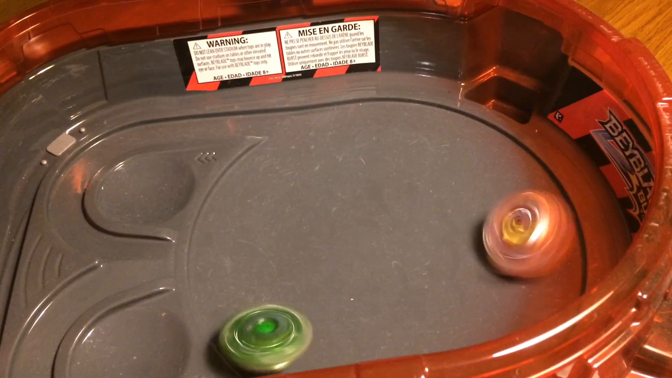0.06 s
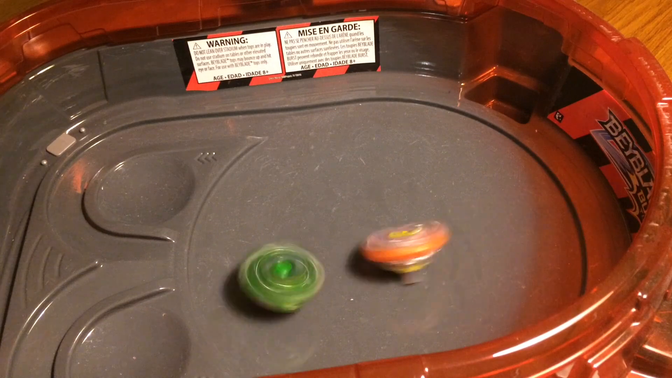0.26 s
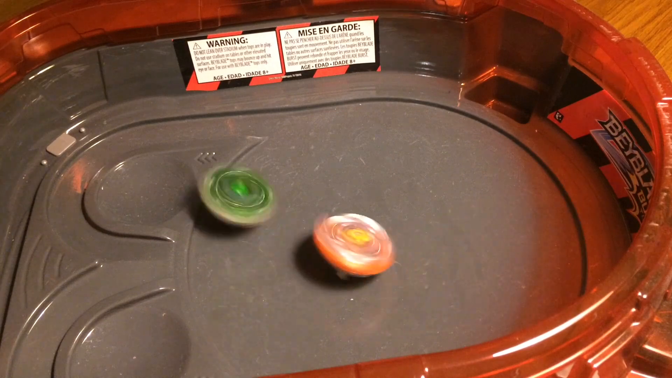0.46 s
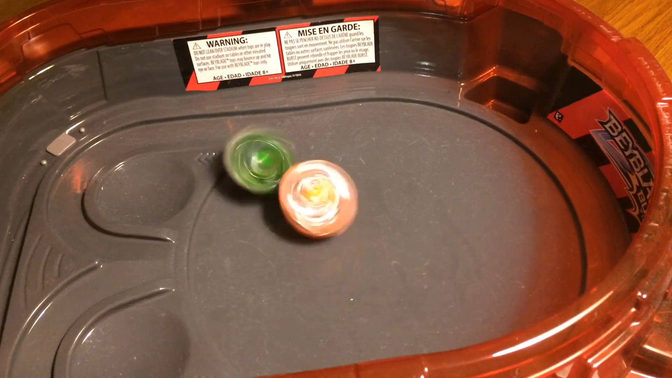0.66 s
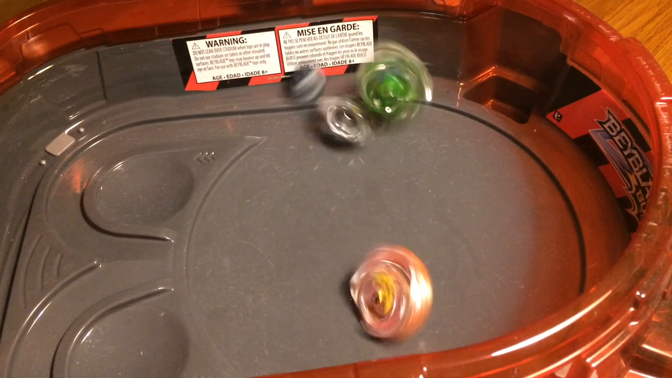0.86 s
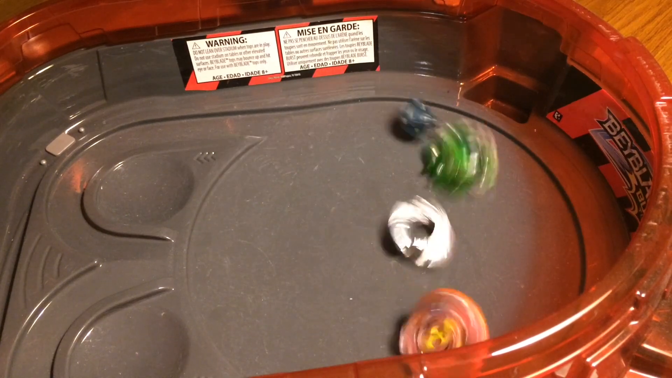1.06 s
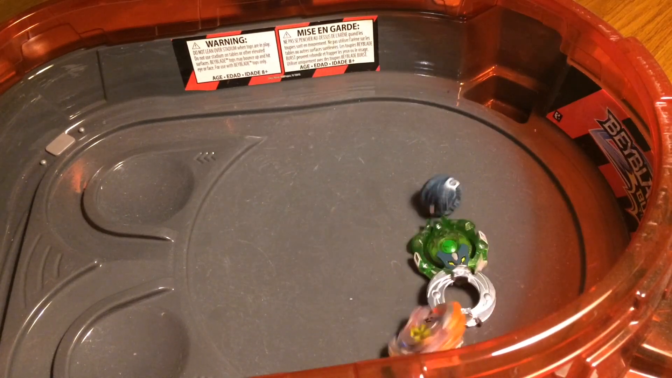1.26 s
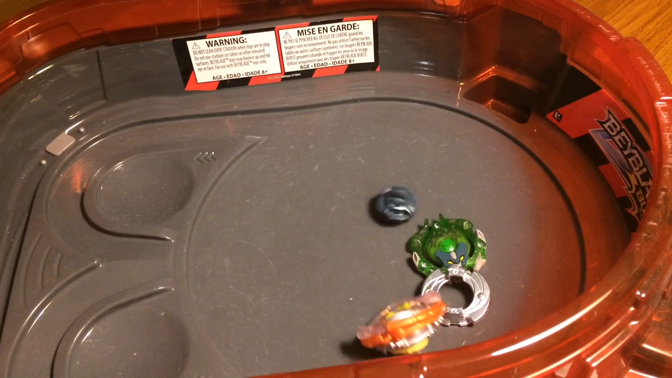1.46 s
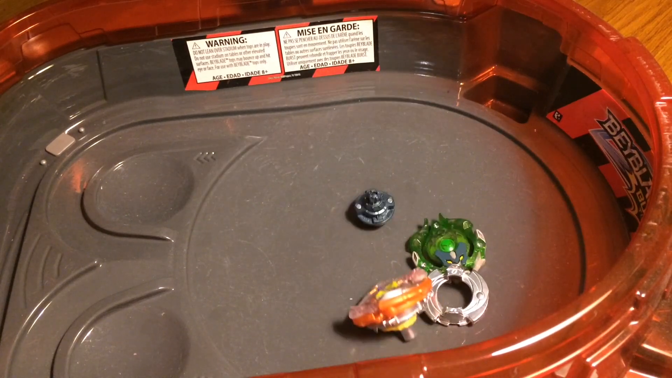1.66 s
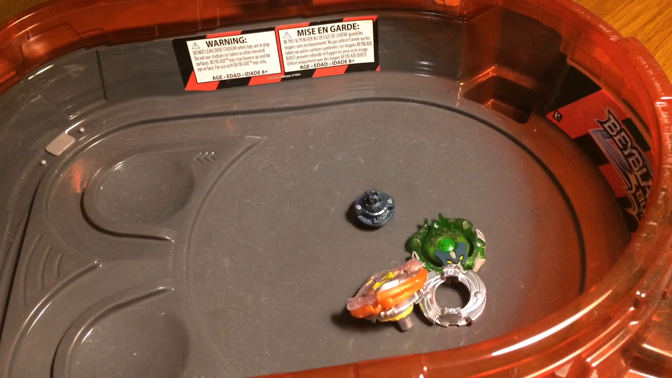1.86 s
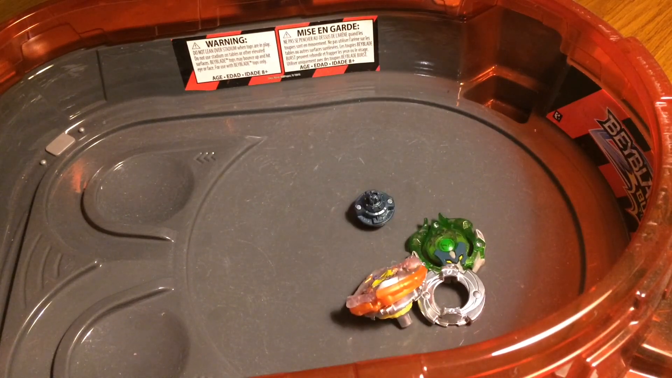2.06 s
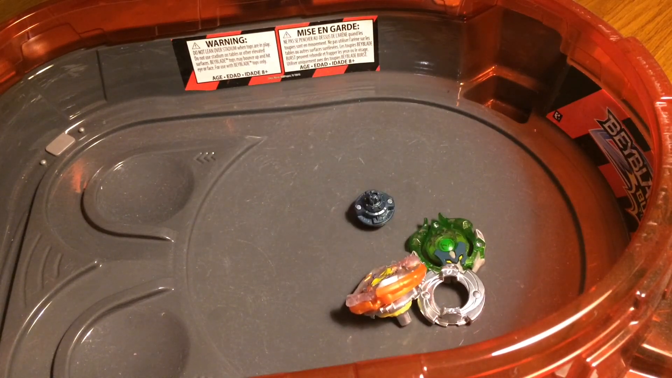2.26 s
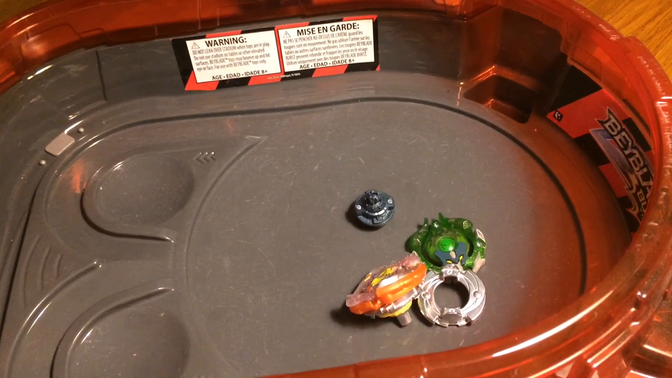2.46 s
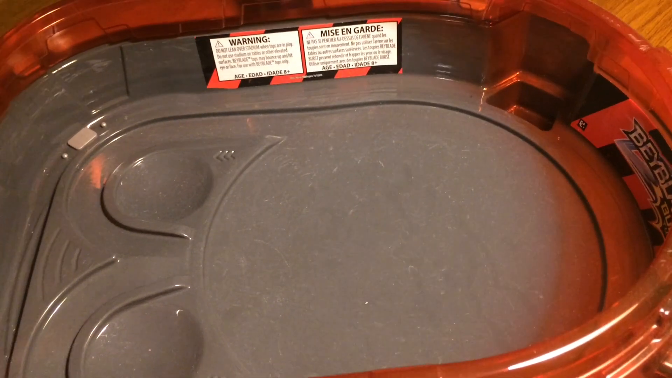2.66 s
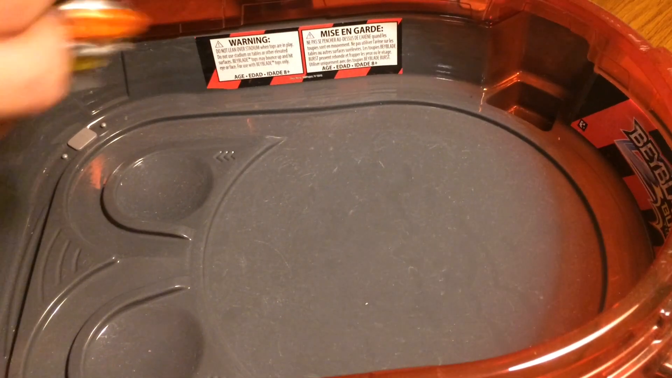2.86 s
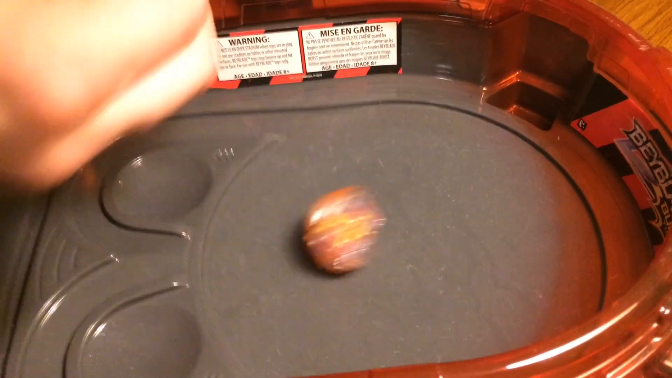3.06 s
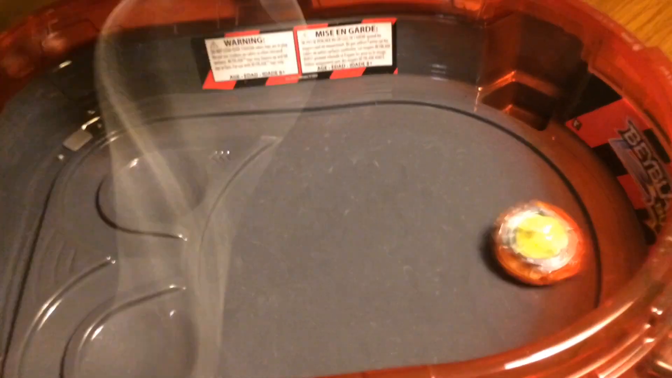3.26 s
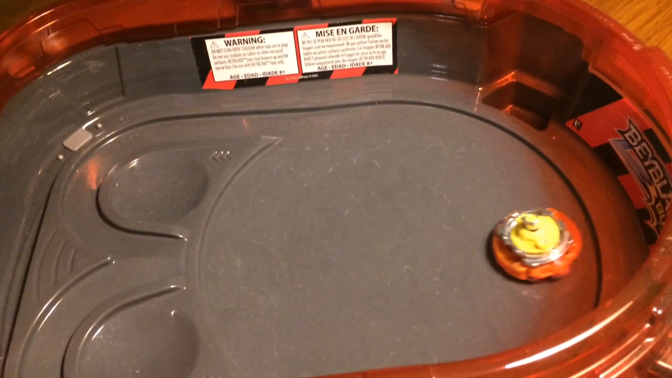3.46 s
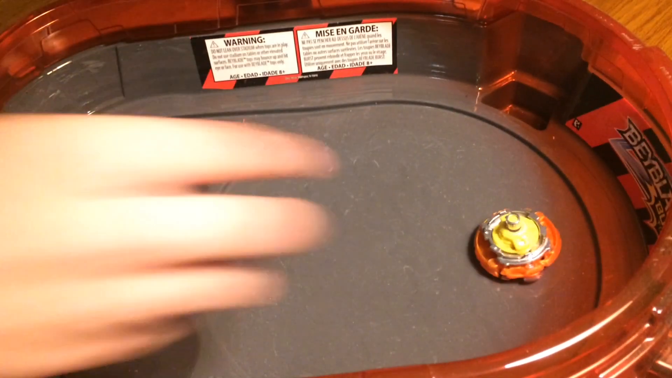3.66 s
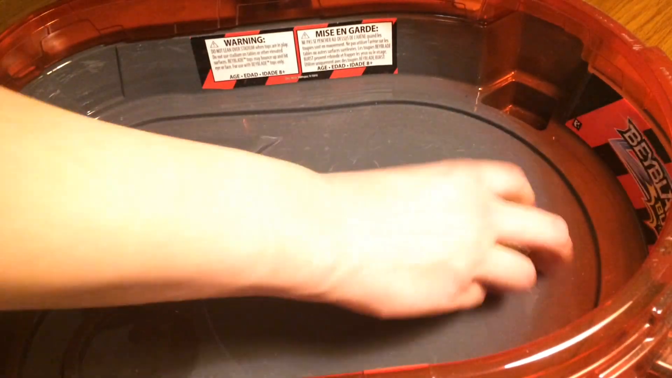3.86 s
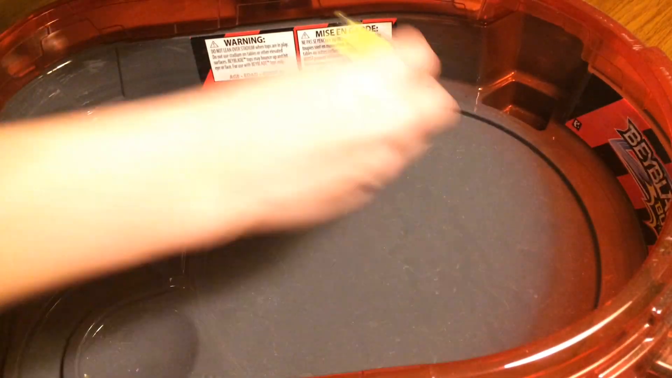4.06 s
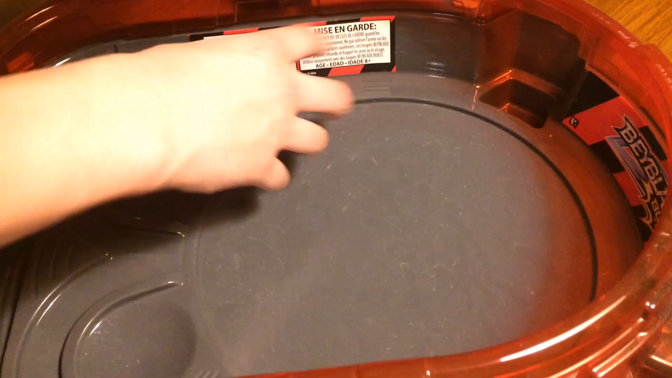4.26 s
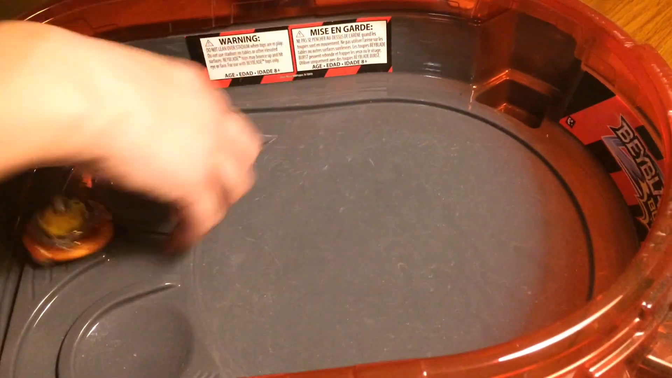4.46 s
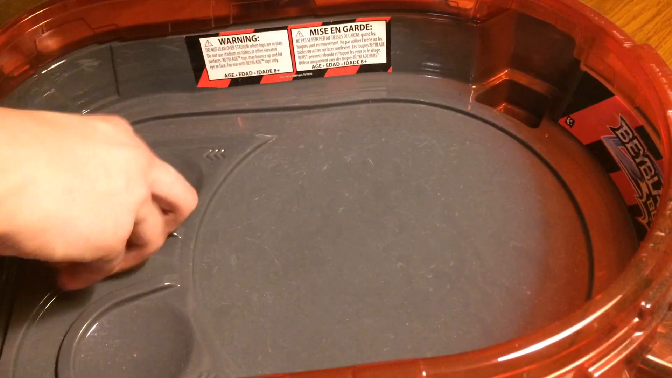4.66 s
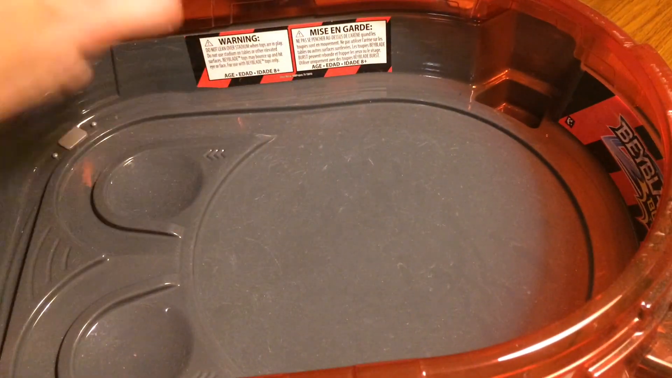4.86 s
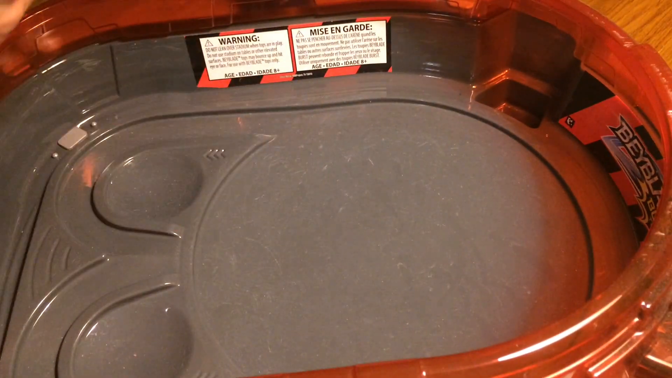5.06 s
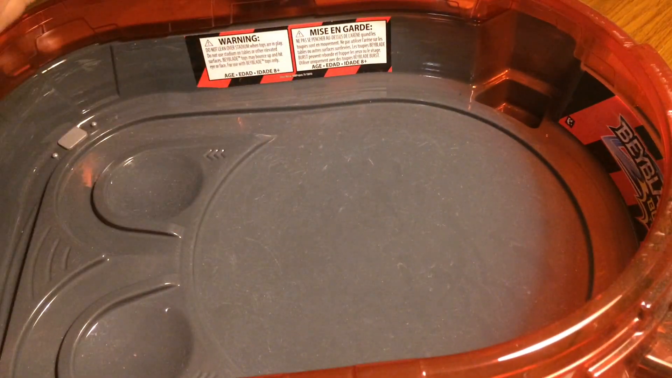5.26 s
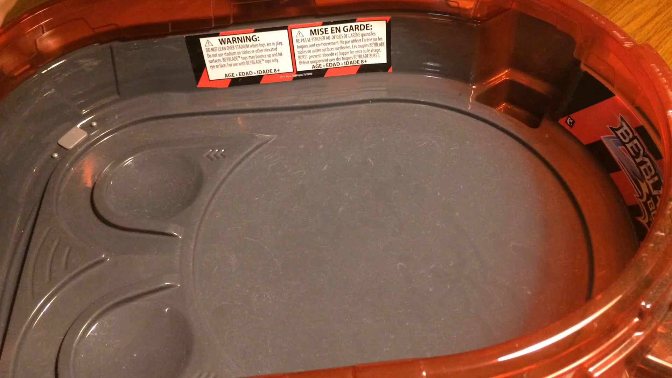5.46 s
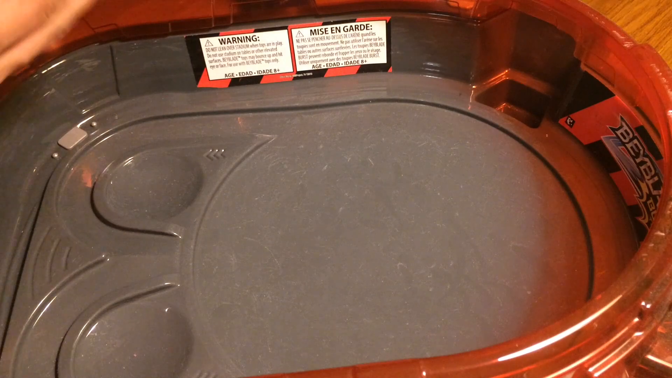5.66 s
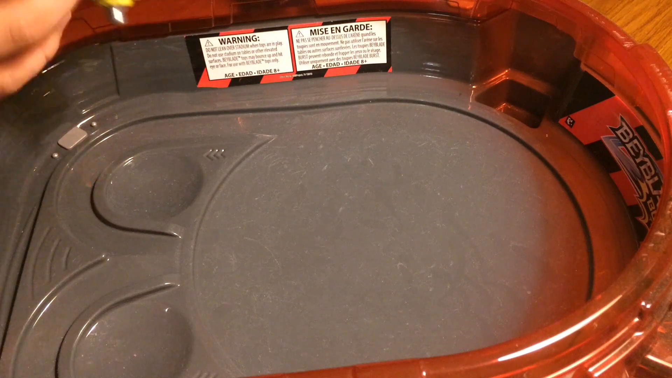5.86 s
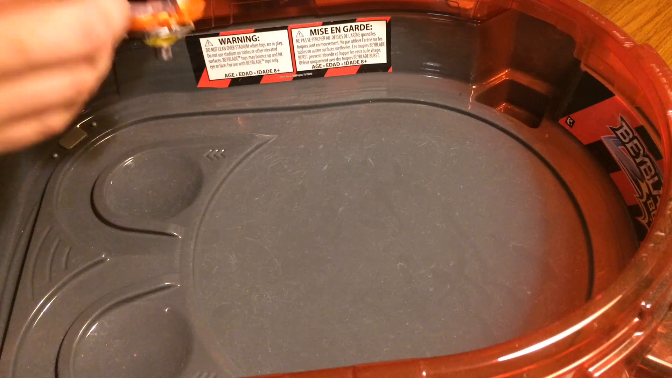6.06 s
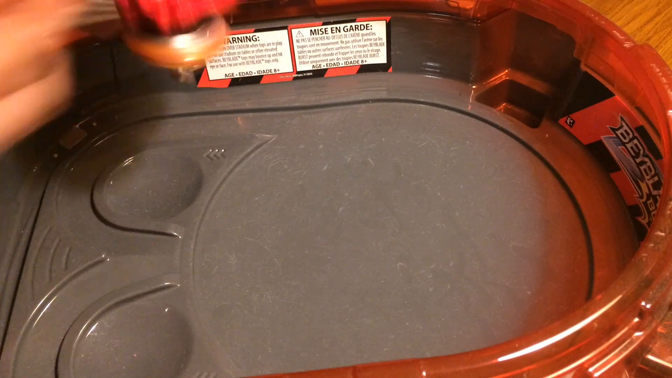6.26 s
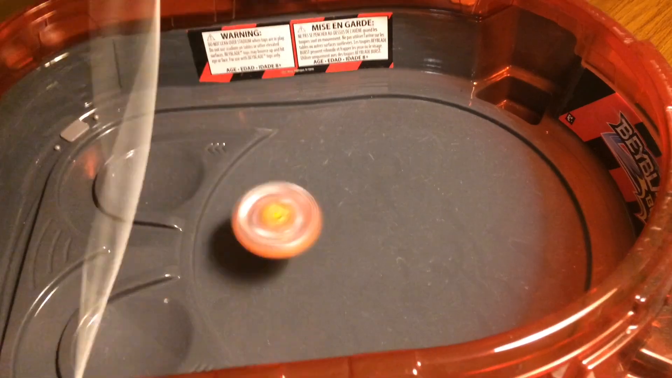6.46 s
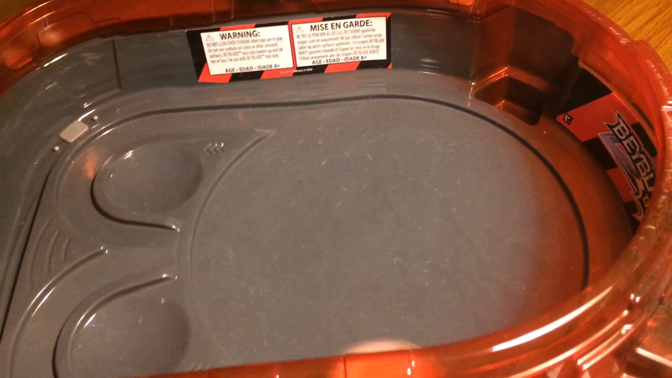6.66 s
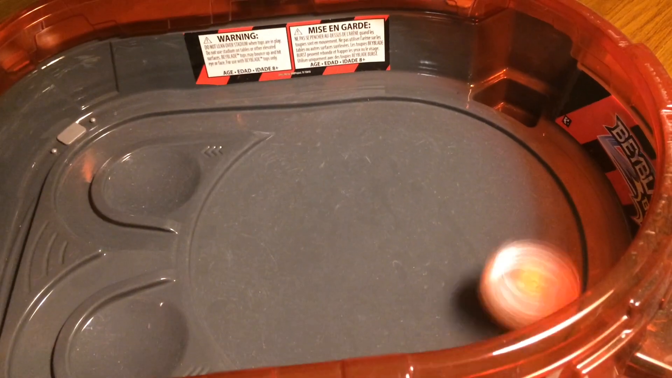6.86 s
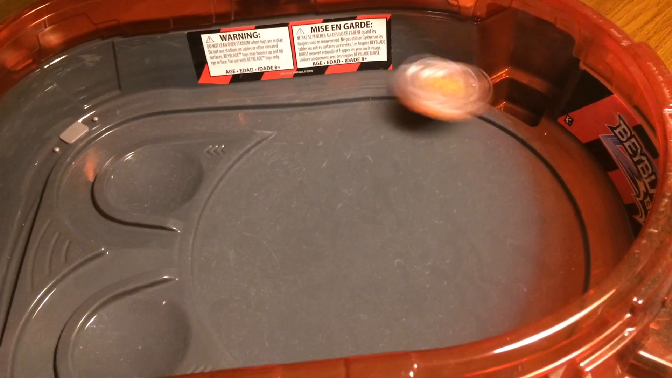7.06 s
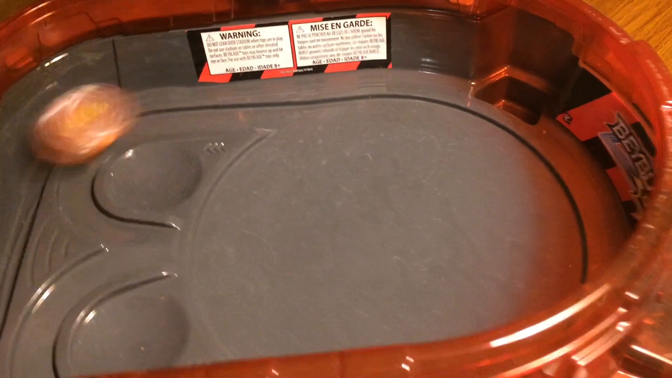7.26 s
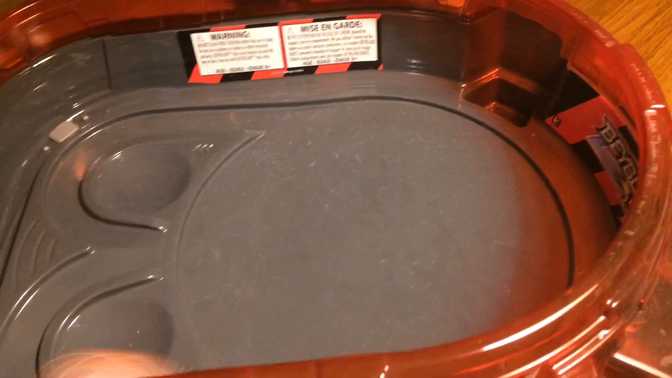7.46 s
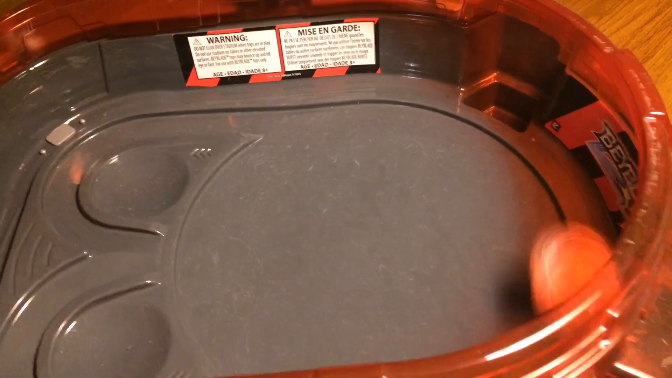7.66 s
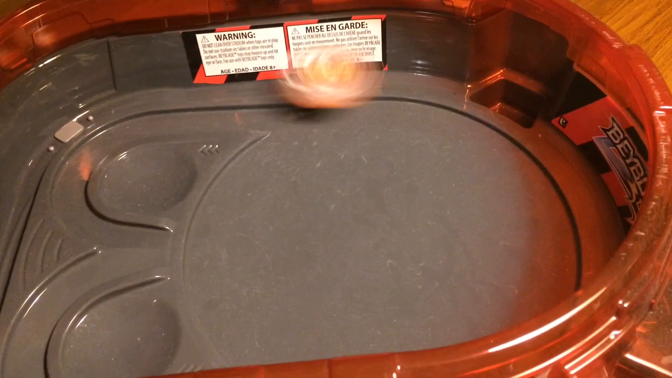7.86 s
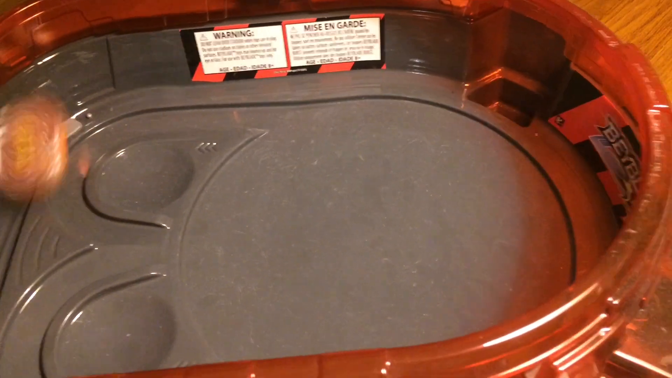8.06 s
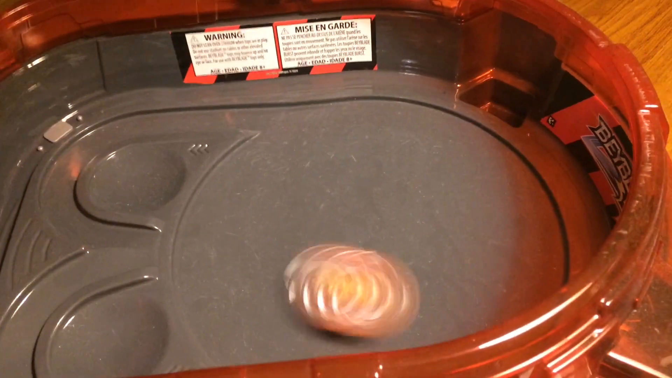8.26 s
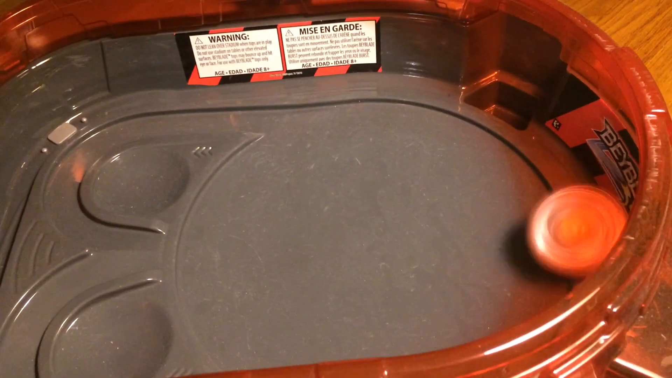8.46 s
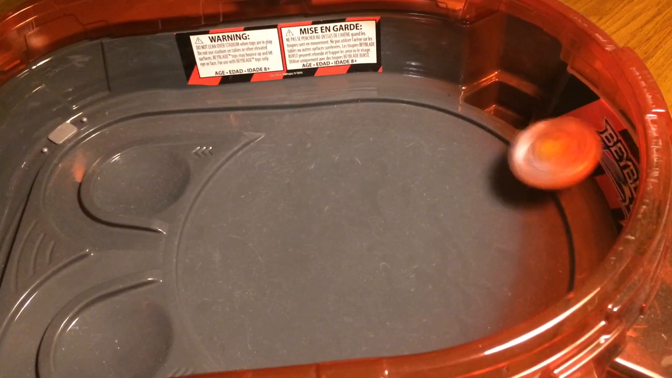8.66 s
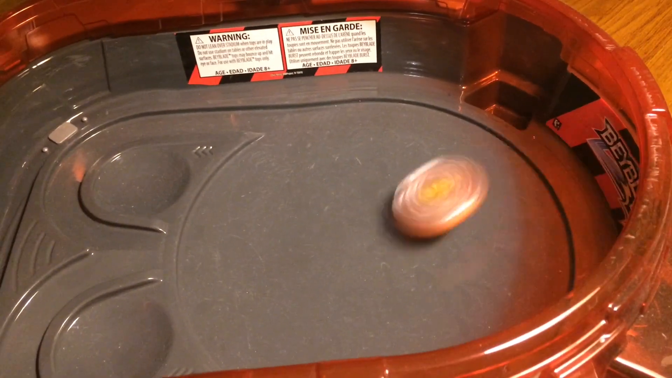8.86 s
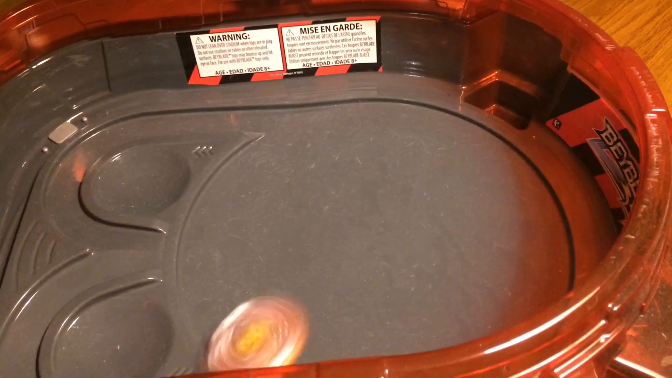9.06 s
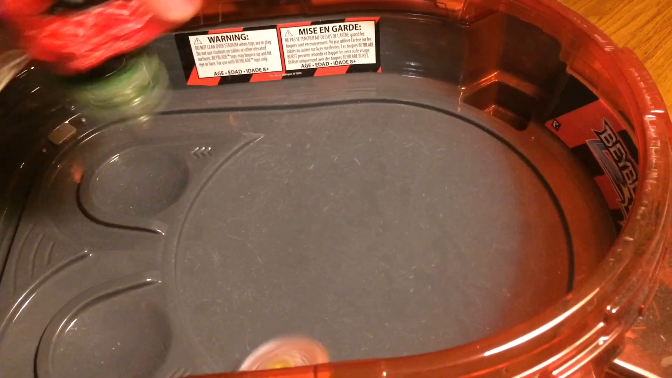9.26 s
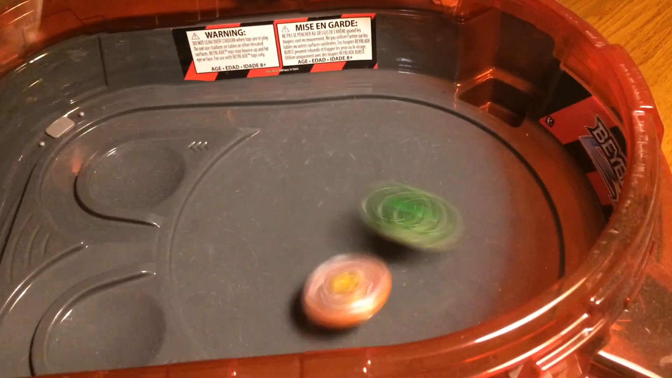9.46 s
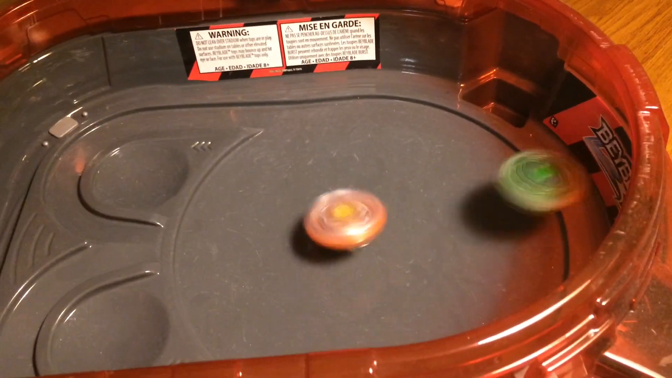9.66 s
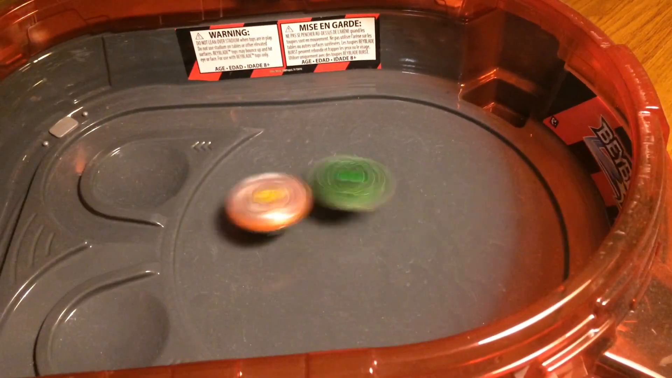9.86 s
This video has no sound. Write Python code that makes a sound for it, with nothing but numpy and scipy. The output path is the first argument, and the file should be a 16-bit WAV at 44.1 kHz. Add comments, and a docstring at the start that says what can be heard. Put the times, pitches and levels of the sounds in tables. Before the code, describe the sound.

Very close in a small quiet room, plastic tops roll and crack together in a thin hollow arena. One bursts and its metal ring jingles. After a near-silent pause, a string launcher zips and a top clatters down; a hand clicks its parts. A second pull sends it drumming loudly along the rim, then a third adds another top and more knocks. The loudest hits distort.

```python
"""Plastic tops roll, knock and clash in a thin arena in a small quiet room: each blow is a burst of impacts on
ringing shell modes. One top bursts and its metal ring, a sum of dying sines, jingles; a hand then gathers and
clicks the parts (noise ticks, fine grit). A geared string launcher whirs up three times, as rattle with a rising
mesh tone; after each pull tops roll and knock again, with clicks of a metal disc after the first two. After the
second they drum along the rim. The loudest blows overload the input of the close microphone."""
import sys
import numpy as np
from scipy import signal
from scipy.fft import rfft, irfft, next_fast_len
from scipy.io import wavfile
from scipy.ndimage import uniform_filter1d

SR = 44100
rng = np.random.default_rng(int(sys.argv[2]) if len(sys.argv) > 2 else 0)


def master_out(mix):
    """Clip the mix to full scale and print it as 16-bit PCM to the path in sys.argv[1]."""
    frames = np.transpose(np.atleast_2d(mix))
    ceiling = np.clip(frames, -1, 1)
    pcm = np.round(ceiling * 32767).astype(np.int16)
    wavfile.write(sys.argv[1], SR, pcm)


N = 437031


def gain_of(db):
    """Level law: decibels to an amplitude factor."""
    return 10 ** (np.asarray(db) / 20)


def evened(x):
    """Energy normalisation: scales to rms 1."""
    return x / np.sqrt(np.mean(x ** 2) + 1e-20)


def peaked(x):
    """Peak normalisation: scales to peak 1."""
    return x / (abs(x).max() + 1e-20)


def read(points, hz):
    """Interpolation of a (Hz, value) table on a log-frequency axis."""
    f, value = np.transpose(points)
    return np.interp(np.log(hz + 1), np.log(f + 1), value)


def add(mix, s, sound):
    """Superposition: mixes a sound in at s seconds."""
    part = mix[max(round(s * SR), 0):][:len(sound)]
    part += sound[:len(part)]


def coloured(x, spectrum):
    """Linear filtering by a (Hz, dB) table."""
    size = next_fast_len(len(x))
    gain = gain_of(read(spectrum, np.fft.rfftfreq(size, 1 / SR)))
    return irfft(rfft(x, size) * gain, size)[:len(x)]


def hump(x, hz, octaves, db):
    """Broad resonance: lifts a smooth range of the spectrum around hz."""
    away = np.log2((np.fft.rfftfreq(len(x), 1 / SR) + 1) / hz) / octaves
    return irfft(rfft(x) * gain_of(db * np.exp(-away ** 2)), len(x))


def ringing(modes, seconds):
    """Modal decay: one exponentially dying sine a mode, as rows."""
    hz, db, t60 = np.transpose(modes)[:, :, None]
    t = np.arange(round(seconds * SR)) / SR
    return gain_of(db - 60 * t / t60) * np.sin(2 * np.pi * hz * t)


def slow(size, width):
    """Low-passed noise: a smooth random wander of rms 1."""
    once = uniform_filter1d(rng.standard_normal(size), int(width))
    return evened(uniform_filter1d(once, int(width)))


def chatter(size, per_s, spread_db):
    """Random impact train: tiny impacts of either sign, a few much larger than the rest."""
    height = gain_of(spread_db * np.minimum(rng.exponential(1, size), 4)) * rng.choice([-1., 1.], size)
    return height * (rng.random(size) < per_s / SR)


# spectrum of the quiet room air: frequency_hz, relative level_db per Hz
AIR_SPECTRUM = [(20, -42), (45, -15), (90, -13), (110, -6), (195, -10.5), (242, -21), (293, -14.5),
                (400, -22.5), (775, -29), (16000, -49)]
AIR_DB = -59.5  # rms


def quiet_air():
    """Stationary noise: a steady random pressure with a fixed spectrum."""
    return gain_of(AIR_DB) * evened(coloured(rng.standard_normal(N), AIR_SPECTRUM))


# each band's reverberation time: frequency_hz, t60_s
ROOM_DECAY = [(100, 0.17), (500, 0.36), (2000, 0.33), (6000, 0.33), (14000, 0.24)]


def room(x):
    """Frequency-dependent reverberation: three sparse random tails, faded in turn for a smooth, even echo."""
    out, slots = np.zeros(N), np.arange(200, SR // 2 - 20, 20)
    for k in range(3):
        taps = np.zeros(SR // 2)
        taps[slots + rng.integers(0, 20, len(slots))] = rng.choice([-1., 1.], len(slots))
        hz, t, bands = signal.stft(taps, SR, nperseg=256)
        decay = gain_of(-60 * t / read(ROOM_DECAY, hz)[:, None])
        tail = signal.istft(bands * decay, SR, nperseg=256)[1]
        # fixed 20 Hz swings, 60 degrees apart: their squares add up to 1
        turn = np.sqrt(2 / 3) * np.cos(np.pi * (np.arange(N) * 40 / SR + k / 3))
        out += signal.fftconvolve(x * turn, tail / np.linalg.norm(tail))[:N]
    return out


# deep jolts through the table as the launcher is worked: start_s, length_s, level_db
TABLE_JOLTS = [(3.16, 0.38, -34), (6.43, 0.18, -34), (9.08, 0.14, -34), (9.361, 0.045, -23.5)]


def jolts():
    """Band-limited noise: short swells of deep rumble."""
    out, band = np.zeros(N), signal.butter(2, [44, 75], "band", fs=SR, output="sos")
    for s, length, db in TABLE_JOLTS:
        size = round(length * SR)
        rumble = evened(signal.sosfilt(band, rng.standard_normal(size)))
        add(out, s, gain_of(db) * rumble * signal.windows.tukey(size, .4))
    return out


# fingers brushing over plastic parts: start_s, length_s, level_db
FINGER_RUSTLES = [(1.95, 0.074, -63.5), (2.862, 0.2, -70), (5.345, 0.15, -48), (5.729, 0.087, -53),
                  (6.119, 0.22, -61.5)]


def rustles():
    """Friction as many micro-impacts: soft swells of fine grit."""
    out = np.zeros(N)
    for s, length, db in FINGER_RUSTLES:
        grit = hump(chatter(round(length * SR), 2500, spread_db=6.0), 2700, octaves=2.8, db=34)
        add(out, s, gain_of(db) * evened(grit) * signal.windows.tukey(len(grit), .7))
    return out


# small clicks: loose or handled parts, the launcher, light knocks and hops of the rolling tops:
# start_s, peak level_db before the bass cut, loudest pitch_hz
SMALL_CLICKS = [(0.0588, -20, 1270), (0.1377, -20.5, 1310), (0.222, -20, 1280), (0.3383, -18, 1220),
                (0.422, -12, 1240), (0.5378, -18.5, 1060), (0.673, -15, 1630), (0.8488, -13, 1080),
                (1.031, -12, 1200), (1.1627, -15.5, 1710), (1.1988, -22, 1220), (1.2565, -20, 1190),
                (1.308, -23, 1040), (1.3693, -17, 1850), (1.5717, -20, 980), (1.608, -21, 1300),
                (1.6358, -26, 1020), (1.6653, -37, 1210), (1.6927, -24, 3220), (1.715, -27, 1200),
                (1.8862, -27.5, 1800), (1.9504, -45, 6600), (2.0023, -43.5, 1096), (2.5247, -50, 1050),
                (2.8737, -48, 2020), (2.9732, -35.5, 2870), (3.5448, -17, 5530), (3.591, -3.5, 5230),
                (3.996, -23, 1215), (4.303, -15, 1710), (5.0271, -11, 2700), (5.1463, -30.5, 2730),
                (5.1943, -38, 2580), (5.3083, -36.5, 3100), (5.3536, -12.5, 3130), (5.36, -17, 3000),
                (5.3737, -7.5, 3380), (5.459, -28, 3360), (5.4999, -16.5, 2670), (5.5497, -37.5, 1330),
                (5.7457, -33.5, 2510), (5.767, -31.5, 2600), (6.313, -15, 1780), (6.4296, 1.5, 3540),
                (6.672, -13.5, 3160), (6.788, -13, 1050), (6.8603, -2, 1170), (8.0463, -3, 3450),
                (8.0707, -9, 1130), (8.318, -12, 1297), (8.656, -13.5, 1240), (8.704, -5, 1780),
                (8.75, -17, 1450), (9.64, -12, 1784)]
SOFT_DB, SOFT_RISE_S = -53.5, 0.0024  # a tick this quiet is fully soft and rises this slowly
ECHO_T60_S, ECHO_DB = 0.39, -19.5


def ticks():
    """Impact bandwidth: small clicks, each with a second bounce and an echo; softer ones are rounder and duller."""
    out, t = np.zeros(N), np.arange(15000) / SR
    echo = gain_of(ECHO_DB - 60 * t / ECHO_T60_S) * np.minimum(t / .008, 1)
    for s, db, hz in SMALL_CLICKS:
        soft = np.clip(db / SOFT_DB, .02, 1)
        rise = np.minimum(t / (SOFT_RISE_S * soft ** 2), 1)
        since_bounce = t - rng.uniform(0.012, 0.019)
        shape = rise * np.exp(-t / 0.0039) + 0.13 * np.exp(-abs(since_bounce) / 0.00084)
        centre_hz = 3600 * (hz / 3600) ** soft  # hard ticks centre near 3600 Hz, soft ones on their tone
        colour = hump(rng.standard_normal(len(t)), centre_hz, octaves=3.47, db=37.5)
        toned = hump(colour, hz, octaves=0.2, db=6.0 + 7.8 * soft)
        add(out, s, gain_of(db) * peaked(toned * (shape + echo)))
    thin = signal.butter(2, 700, "high", fs=SR, output="sos")  # small clicks have little bass
    return signal.sosfilt(thin, out)


# modes of the loose metal ring: frequency_hz, level_db, t60_s
RING_MODES = [(9448, -5, .3), (9706, 0, .36), (12660, -14, .18), (14080, -5, .26), (15500, -6, .17)]
# its strikes: start_s, level_db
RING_STRIKES = [(.433, -34.5), (0.762, -27), (1.032, -38.5), (1.273, -24.5), (3.172, -26.5)]


def loose_ring():
    """Modal superposition: each strike sets the ring's modes off in a slightly different mix."""
    out, rows = np.zeros(N), ringing(RING_MODES, .4)
    for s, db in RING_STRIKES:
        add(out, s, gain_of(db + 1.5 * rng.standard_normal(len(RING_MODES))) @ rows)
    return out


# modes of the metal weight disc held in its top: frequency_hz, level_db, t60_s
DISC_MODES = [(5880, 0, .25), (7300, 0, .14), (8080, 0, .07), (9480, 0, .14)]
# its strikes: start_s, level_db, favoured mode pitch_hz
DISC_STRIKES = [(3.18, -22, 7300), (3.18, -26, 9480), (3.343, -15, 8080), (4.308, -30, 5880),
                (4.418, -35, 5880), (6.495, -12.5, 8080), (6.868, -13.5, 8080)]


def held_disc():
    """Selective damping: the plastic around the disc silences all but the mode that the strike favours."""
    out, rows = np.zeros(N), ringing(DISC_MODES, 0.27)
    mode_hz = np.transpose(DISC_MODES)[0]
    for s, db, hz in DISC_STRIKES:
        add(out, s, gain_of(db) * rows[np.argmin(abs(mode_hz - hz))])
    return out


# colour of the launcher shell: frequency_hz, relative level_db per Hz
LAUNCHER_SHELL = [(180, -47), (300, -24.5), (1690, -7), (2070, -12), (2840, -3), (4090, -7.5), (16000, -16)]
# string pulls: start_s, length_s, first whir level_db, loudest level_db, first gear mesh pitch_hz, last pitch_hz
STRING_PULLS = [(3.166, 0.23, -34.5, -22, 2420, 10900), (6.289, 0.17, -54, -11, 1207, 10170),
                (9.242, 0.13, -38.5, -11.5, 1490, 9930)]
LOUDEST_SHARE, REST_DB, RUNDOWN_S = 0.72, -41.5, 0.25  # the whir peaks late in the pull, then runs down


def launcher():
    """Gear meshing: teeth rattle in the shell; their faint mesh tone climbs as the string speeds up."""
    out = np.zeros(N)
    for s, length, start_db, top_db, first_hz, last_hz in STRING_PULLS:
        t = np.arange(0, LOUDEST_SHARE * length + RUNDOWN_S, 1 / SR)
        late = t - LOUDEST_SHARE * length
        swell = (start_db - top_db) * (late / late[0]) ** 2
        rundown = (REST_DB - top_db) * late / RUNDOWN_S
        db = top_db + np.where(late < 0, swell, rundown)
        rattle = evened(coloured(chatter(len(t), 3500, spread_db=2.5), LAUNCHER_SHELL))
        throb = gain_of(2.5 * evened(uniform_filter1d(rng.standard_normal(len(t)), 350)))
        hz = first_hz + (last_hz - first_hz) * np.sin(np.pi / 2 * t / length) ** 2
        wander = 1 + .3 * uniform_filter1d(rng.standard_normal(len(t)), 60)
        mesh = np.sin(2 * np.pi * np.cumsum(hz * wander) / SR)
        pulled = (t < length) * t / length  # the mesh tone grows, and sounds only while pulled
        add(out, s, gain_of(db) * (rattle * throb + 0.72 * mesh * pulled))
    return out


# arena floor as a drum, also struck by the blows: frequency_hz, level_db, t60_s
FLOOR_DRUM = [(110, -6, .09), (167, 0, .1), (205, -6, .06), (265, -9, .05), (365, -3, .06), (480, -6, .05),
              (560, -6, .05)]
# colour of the tip scraping on the floor: frequency_hz, relative level_db per Hz
TIP_SCRAPE = [(180, -32.5), (300, -1), (1280, -4), (5800, -20), (12900, -30), (16000, -46)]
# patches of floor that the tip crosses: pitch_hz
PATCH_TONES = 500, 1250, 1800, 2800
# spells of rolling: start_s, steady until_s, stop_s, drumming level_db, scrape level_db, change by the stop_db
ROLLING_SPELLS = [(0, 0.413, 0.55, -34, -30, -3.5), (0.47, 0.698, 1.02, -26.5, -35.5, -8),
                  (0.76, 1.342, 1.57, -30, -28, -23), (1.567, 1.67, 1.95, -38.5, -37.5, -30),
                  (3.164, 3.415, 3.56, -31, -23, -29), (3.928, 3.987, 4.12, -43, -39, -32),
                  (4.191, 4.252, 4.67, -28, -30.5, -14), (6.422, 7.0, 7.6, -33, -31, -4.5),
                  (7.6, 8.78, 8.97, -32, -37.5, -7), (8.917, 8.984, 9.25, -35, -33.5, 8),
                  (9.252, 9.616, 9.91, -29.5, -28, -4)]


def rolling():
    """Roughness excitation: dense bumps drive floor and scrape; the wobbling top presses unevenly and skips."""
    out, drum = np.zeros(N), ringing(FLOOR_DRUM, .2).sum(0)
    for start, slows, stop, drum_db, scrape_db, change_db in ROLLING_SPELLS:
        t = np.arange(start, stop, 1 / SR)
        size = len(t)
        press = gain_of(3.1 * slow(size, 460))
        skips = signal.lfilter([1], [1, -.996], abs(chatter(size, 45, spread_db=1.0)))
        bumps = chatter(size, 2200, spread_db=2.5) * (press + skips)
        drive = bumps + 1.6 * chatter(size, 3000, spread_db=1.0)
        drummed = signal.fftconvolve(drive, drum)[:size]
        rumble = gain_of(drum_db) * evened(hump(drummed, 145, octaves=0.69, db=10))
        scratch = coloured(bumps, TIP_SCRAPE)
        patches = sum(hump(scratch, hz, octaves=0.28, db=9.5) * gain_of(6.2 * slow(size, 900))
                      for hz in PATCH_TONES)
        scrape = gain_of(scrape_db) * evened(patches)
        course = gain_of(np.interp(t, [slows, stop], [0, change_db]))
        add(out, start, course * (rumble + scrape) * signal.windows.tukey(size, 400 / size))
    return out


# arena walls and plastic top bodies, too many modes to tell apart: frequency_hz, level_db per Hz
SHELL_SPECTRUM = [(200, -22.5), (350, 2.5), (600, -0.5), (900, -0.5), (1300, 0), (2600, -3), (5000, -16),
                  (7000, -36.5)]
# colour of hard rims meeting: frequency_hz, relative level_db per Hz
CRACK_SPECTRUM = [(3000, -15.5), (5000, 1), (9000, 0), (16000, -8)]
# The three kinds of blow share the columns: start_s, peak level_db, struck spot pitch_hz, contact_s
# rims knocking on the arena wall
RIM_KNOCKS = [(.37, -12, 440, 0.015), (.389, -12.5, 1030, 0.0053), (.656, -13, 1680, 0.012),
              (.796, -9.5, 587, 0.014), (.815, -2.5, 569, 0.0034), (.94, -3.5, 1190, 0.0047),
              (.977, -3, 625, 0.012), (1.122, -10, 540, 0.0087), (3.366, -0.5, 1094, 0.0043),
              (4.28, -1.5, 564, 0.002), (4.291, -3, 907, 0.017), (4.389, -3.5, 820, 0.0055),
              (6.461, 2, 1231, 0.021), (6.826, 2, 1152, 0.013), (7.413, 3.5, 368, 0.022),
              (7.51, 2, 804, 0.012), (7.614, 2.5, 1444, 0.016), (7.682, 1, 1285, 0.011),
              (7.714, 3, 682, 0.0077), (7.75, -1, 546, 0.0053), (7.789, -3, 1530, 0.0066),
              (7.813, -3.5, 1385, 0.0059), (7.892, 2.5, 1160, 0.0078), (8.033, 0.5, 1324, 0.031),
              (8.14, 4.5, 780, 0.01), (8.445, -2, 538, 0.011), (8.554, -1, 1325, 0.0018),
              (8.601, 0, 1430, 0.0049), (8.617, -1.5, 833, 0.0039), (8.69, 1.5, 1007, 0.011),
              (9.292, -1.5, 3170, 0.014), (9.373, 1.5, 2560, 0.012), (9.423, 1, 471, 0.0091),
              (9.662, -1.5, 1530, 0.038)]
# tops and parts landing on the arena floor
FLOOR_LANDINGS = [(.878, -4.5, 1270, 0.0052), (1.061, -4.5, 1147, 0.0046), (3.168, -3.5, 815, 0.0036),
                  (3.187, -7.5, 500, 0.0065), (3.206, -9, 700, 0.005), (3.225, -5, 520, 0.0029),
                  (3.243, -14, 600, .007), (3.331, -1, 580, 0.01), (3.939, -15.5, 367, 0.027),
                  (4.189, -2.5, 398, 0.006), (4.237, -8.5, 390, 0.0063), (4.32, -7.5, 1230, 0.0082),
                  (4.37, -6, 363, 0.013), (4.434, -10.5, 1190, 0.0048), (4.49, -13, 873, 0.017),
                  (4.635, -19.5, 597, 0.013), (4.706, -13.5, 448, 0.012), (6.521, -2.5, 292, 0.0068),
                  (6.921, -16, 400, 0.0057), (7.148, -12, 1250, 0.0013), (7.218, -14.5, 437, 0.0034),
                  (7.272, -19, 623, 0.0038), (7.319, -17, 500, 0.0027), (8.091, -3, 1470, 0.0092),
                  (8.325, -10, 520, 0.012), (8.365, -12, 364, 0.01), (8.847, -13.5, 348, 0.0034),
                  (8.921, -15, 460, 0.0025), (8.965, -16.5, 408, .004), (9.566, -10, 478, 0.011),
                  (9.788, -10, 1550, 0.0046), (9.875, -13, 1700, 0.0046)]
# hard edge against hard edge
EDGE_CLASHES = [(.433, -7.5, 5810, 0.0047), (.748, -10.5, 2920, 0.013), (.759, -4, 3250, 0.0054),
                (.77, -4.5, 2580, 0.0052), (.779, -7, 1470, 0.0045), (.969, -7.5, 2440, 0.0024),
                (.992, -5.5, 900, .0012), (1.269, -15.5, 550, 0.0099), (3.306, -3.5, 550, 0.0051),
                (3.957, -15.5, 1250, 0.0039), (6.696, -3.5, 2800, 0.0054), (7.097, -5.5, 1110, 0.0024),
                (7.165, -7.5, 1250, 0.0076), (7.341, -8, 423, 0.008), (8.212, -7, 1970, 0.0024),
                (9.195, -5.5, 1195, 0.0046)]
# what each kind adds: arena thump_db re peak, hard crack_db re peak
KNOCK_MIX = (-29.5, -7.5)
LANDING_MIX = (-0.71, -6.5)
CLASH_MIX = (-13, 3.8)
SHELL_T60_S = 0.018  # common to all shell modes
SPOT_T60_S, SPOT_DB = .045, -7.5  # the struck spot rings on by itself, re the body's peak
THUMP_T60_S = 0.087  # a top resting on the floor damps its thump, on top of the drum's own decay
CRACK_RISE_S = 0.00094


def blows():
    """Repeated impact: a spinning rim chatters through each contact and excites shell modes near the spot's tone."""
    out, drum, t = np.zeros(N), ringing(FLOOR_DRUM, .2), np.arange(2646) / SR
    kinds = (RIM_KNOCKS, KNOCK_MIX), (FLOOR_LANDINGS, LANDING_MIX), (EDGE_CLASHES, CLASH_MIX)
    rows = [tuple(row) + tuple(mix) for table, mix in kinds for row in table]
    for s, db, hz, contact, thump_db, crack_db in rows:
        release = np.exp(-(t / np.clip(contact, .001, .04) / 1.49) ** 1.9)
        force = release * np.minimum(0.74 + t / 0.0026, 1)
        knocks = force * chatter(len(t), 1100, spread_db=3.5)
        knocks[0] = 2.68  # the first touch

        # each knock draws one of three noise-like shell responses, for a less tonal clatter
        choice, body = rng.integers(0, 3, len(t)), 0
        for k in range(3):
            modes = coloured(rng.standard_normal(len(t)), SHELL_SPECTRUM)
            shell = hump(modes, hz, octaves=0.24, db=8.5) * gain_of(-60 * t / SHELL_T60_S)
            body = body + signal.fftconvolve(knocks * (choice == k), shell)[:len(t) + 1000]
        pair = [(hz, 0, SPOT_T60_S), (hz * rng.uniform(1.1, 1.4), -6, SPOT_T60_S)]
        tone = signal.fftconvolve(knocks, ringing(pair, 0.073).sum(0))[:len(body)]
        add(out, s, gain_of(db) * peaked(peaked(body) + gain_of(SPOT_DB) * peaked(tone)))

        push = uniform_filter1d(knocks, 24)  # the floor feels only the slow part of the force
        drum_mix = gain_of(3.0 * rng.standard_normal(len(FLOOR_DRUM)))
        thump = signal.fftconvolve(push, drum_mix @ drum)
        damping_db = -60 * np.arange(len(thump)) / SR / THUMP_T60_S
        add(out, s, gain_of(db + thump_db + damping_db) * peaked(thump))

        sparks = signal.lfilter([1], [1, -.98], abs(knocks))  # each knock leaves a brief burst
        rise = np.minimum(0.12 + t / CRACK_RISE_S, 1)
        grit = coloured(rng.standard_normal(len(t)), CRACK_SPECTRUM) * (force + 0.71 * sparks) * rise
        add(out, s, gain_of(db + crack_db) * peaked(grit))
    return out


def scene():
    """Superposition of everything near the microphone, its room tail and the quiet air."""
    near = rustles() + launcher() + rolling() + blows()
    # a small thin arena radiates little deep bass
    near = signal.sosfilt(signal.butter(3, 80, "high", fs=SR, output="sos"), near)
    metal = loose_ring() + held_disc()
    return (quiet_air() + gain_of(-8.0) * room(near) + jolts() + ticks() + metal + near)[None]


EDGE_HZ = 15800  # upper band limit


def record(dry):
    """Saturation and band limit: the input overloads near full scale, then the top treble is cut."""
    held = dry / (1 + abs(dry / .93) ** 6) ** (1 / 6)
    lowpass = signal.firwin(255, EDGE_HZ, window=("kaiser", 7), fs=SR)
    return signal.oaconvolve(held, lowpass[None], "same")


dry = scene()
out = record(dry)
master_out(out)
```